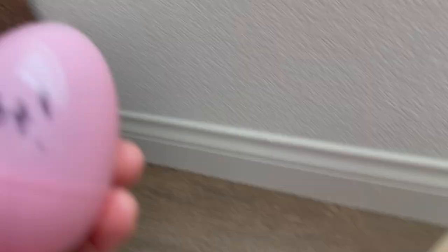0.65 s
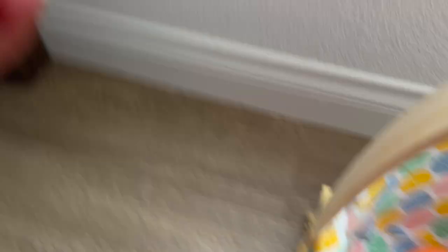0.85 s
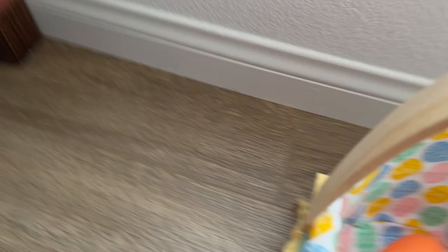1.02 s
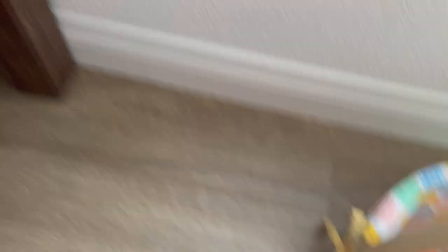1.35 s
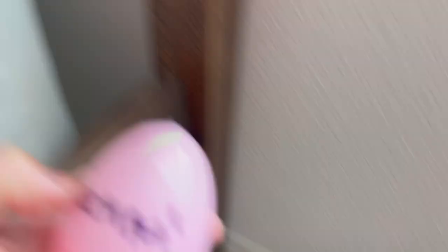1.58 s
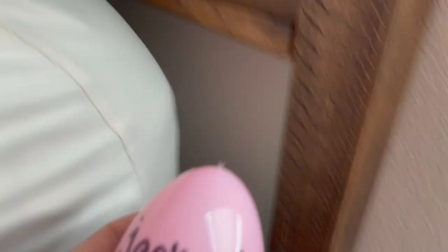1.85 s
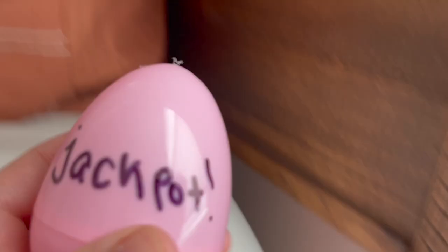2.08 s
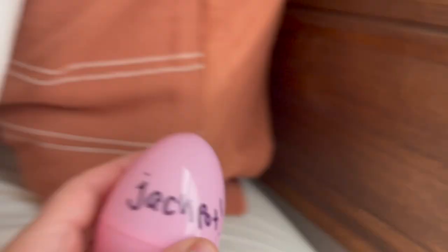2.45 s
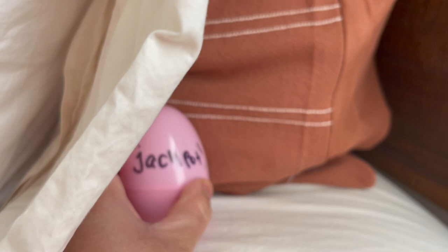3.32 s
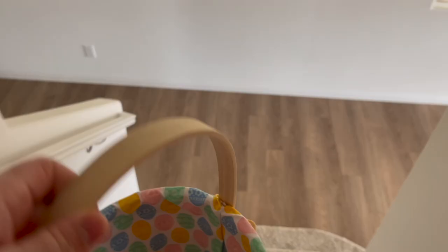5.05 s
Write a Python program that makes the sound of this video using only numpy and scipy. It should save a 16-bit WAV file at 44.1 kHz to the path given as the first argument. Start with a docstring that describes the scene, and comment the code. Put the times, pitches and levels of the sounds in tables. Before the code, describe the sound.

A dull low thump from the hand starts the scene, over soft unsteady rumble and faint still air in a small bedroom. At 0.5 seconds a light, hollow plastic egg gives a sharp close knock, with quick smaller rattles until 0.65, amid a soft cloth brush. After a near pause, a second cluster of hollow clacks comes at 1.15 to 1.27, with short crisp scrapes. Low bumps and small fabric rubs follow to 2 seconds, with a very faint tick. Bedding then rustles in longer airy strokes, fuller near 2.6, quieter around 3.4, swelling again near 4.1 and thinning after 4.3. Around 5.1 a cloth stroke stops abruptly with a muffled tick; tiny dry clicks follow near 5.65, 5.9 and 6.4, among soft low thuds and weak rustling. Everything is close, in stereo from a hand-held phone, the cloth slightly left, with little room echo.

```python
"""Cloth slides in soft strokes, a hollow plastic shell knocks, rattles and ticks, over a low rumble and thuds.
Place: a small bedroom, where an egg is carried to a bed and pushed under a duvet that lies to the left.
Distance: the egg sounds close, direct and much stronger than the room's answer; its contacts ring resonances.
Microphone: a stereo pair in a hand-held phone, shaken by the hand into decaying low swings and noise.
Cloth, tremor, mattress flutter and still air are shaped noise."""
import sys
import numpy as np
from scipy import signal
from scipy.fft import rfft, irfft, next_fast_len
from scipy.io import wavfile
from scipy.ndimage import uniform_filter1d, map_coordinates

SR = 44100
rng = np.random.default_rng(int(sys.argv[2]) if len(sys.argv) > 2 else 0)


def waveform_to_disk(signal):
    """Save audio, clipped to [-1, 1], as 16-bit WAV at the path in sys.argv[1]."""
    frames = np.transpose(np.atleast_2d(signal))
    scaled = np.clip(frames, -1, 1) * 32767
    samples = np.round(scaled).astype(np.int16)
    wavfile.write(sys.argv[1], SR, samples)


def volts_from_db(level):
    """Convert decibel levels to linear amplitude ratios."""
    exponent = np.asarray(level, float) / 20
    return 10 ** exponent


N = 284116

# resonances of the egg, one deep, two of its air, three of its wall, one of its rim:
# (frequency [Hz], width [Hz], level within its group [dB])
EGG_MODES = [(356.6, 39, 0), (617, 142, 5), (825, 168, 0.5), (1138, 140, 1.5), (1570, 630, -5),
             (2180, 450, -3.5), (3540, 510, 0)]
# knocks on the free shell: (time [s], reference peak [dB], rim ring over it [dB], crack over it [dB],
# contact [ms])
FREE_KNOCKS = [(.506, -12.5, -18.5, -7.5, 3.7), (.543, -31, -7, -5, 5.8), (.551, -35.5, 4.5, -6, 1.2),
               (.562, -25, -2, -13, 5.2), (.569, -22, 1, -3, 2.4), (.581, -36, -4, -4, 2.2),
               (.626, -28.5, -7, -15, 5.1), (.634, -32, -0.5, 3.5, 3.3), (.94, -50, -9, 7.5, 3.6),
               (.962, -48.5, -14, 11, 4.1), (1.155, -19.5, -31, -15, 4.2), (1.187, -23.5, -35, -6, 9.9),
               (1.193, -25, -20, -8, 7.1), (1.201, -24, -18, -19, 7.4), (1.206, -25, -27, -24, 7.5),
               (1.227, -29, -9, -6, 3.9), (1.237, -32, -24, 6.5, 2), (1.256, -41, -22, -1, 4.4),
               (1.267, -34.5, -34, -18.5, 2.6), (4.239, -48, -8, -5, 1.9)]
# ticks on the shell while hand and bedding muffle it: (time [s], reference peak [dB],
# rim ring over it [dB], crack over it [dB], contact [ms])
MUFFLED_TICKS = [(1.988, -48, -4, -14, 6), (3.596, -51, -22, -22, 3.5), (5.126, -42.5, -22, -19.5, 1.5),
                 (5.162, -50.5, -16, -7.5, 3), (5.269, -54, -7, -12, 4.5), (5.607, -54, -11, 2, 7.1),
                 (5.644, -41.5, -18, 7, 4.2), (5.657, -58, -2, 22, 2.9), (5.717, -51, -8, 1, 3.5),
                 (5.887, -48.5, 1.5, 3.5, 2.6), (6.054, -51, -7, 0, 6.1), (6.416, -42.5, -21, -2, 4.2),
                 (6.424, -60, -6, 25, 3)]
# pitch of the egg's air modes, sinking at first as the fingers close round it: (time [s], factor [1])
AIR_MODE_PITCH = [(.5, 1.15), (.65, 1.1), (1.15, 0.94), (6.44, 1.4)]
# strokes of cloth, and near 1.16-1.26 s of fingers slipping on the shell: (fastest moment [s], hiss [dB], #
# swell over the last 10 dB [s], fade over the first 10 dB [s], duller body over hiss [dB]); # swells and fades
# under 8 ms act as 8 ms
CLOTH_STROKES = [(0, -68.5, .1, 0.2, -1), (.45, -52, 0.116, 0.1735, -8.5), (.6, -53, 0.16, 0.1568, -2.5),
                 (.88, -79, 0.6, 0.1, 12), (.95, -69, -0.06, -0.1, -5), (1.13, -71, .14, .03, 3),
                 (1.164, -46.5, .018, .013, -5.5), (1.199, -44.5, .013, 0.01, -13),
                 (1.26, -55.5, 0.01, 0.015, -13), (1.28, -81, .06, .07, 17), (1.418, -58.5, .017, .06, -10),
                 (1.462, -58.5, .045, .035, -20), (1.555, -66.5, .07, .06, -1.5),
                 (1.67, -62.5, .035, .06, -4.5), (1.78, -61.5, .06, .055, -6), (1.89, -70, .1, .1, 2),
                 (1.995, -63, .022, .04, 5), (2.045, -68.5, .04, .045, 5), (2.135, -65.5, .065, 0.16, -10),
                 (2.35, -59.5, .022, .28, -5), (2.6, -54, 0.09, .3, -4), (2.79, -56, 0.27, 0.0652, -7),
                 (2.95, -58.5, 0.13, 0.04, -6), (3.099, -59.5, .1, 0.14, -10), (3.43, -71.5, .14, .07, -9),
                 (3.61, -84, 0.05, 0, 13.5), (3.83, -61, .1, 0.29, -8), (3.95, -59.5, 0.16, 0.29, -9),
                 (4.1, -52.5, 0.1856, 0.19, -9.5), (4.24, -61.5, .2, 0.06, -3.5),
                 (4.5, -73.5, -0.1, .1, -6), (4.6, -62.5, .07, .16, -6.5), (4.97, -58.5, 0.15, .075, -8.5),
                 (5.113, -57, .17, .009, -10.5), (5.24, -75, 0.1, 0.5, 3), (5.365, -67, .06, 0.04, 0.5),
                 (5.69, -65, 0.05, 0.07, 0), (5.9, -74, .2, 0.4, 0), (6.061, -63, 0.02, 0.03, 4.5),
                 (6.12, -73.5, 0.27, 0.1, 0), (6.36, -70, 0.06, 0.2, 0.5)]
# floor of cloth that barely moves, one row for hiss and one for body: (level [dB])
CLOTH_AT_REST = [
    [-87],
    [-94],
]
# bright noise of sliding fibres: (frequency [Hz], relative density [dB])
HISS_SPECTRUM = [(1500, -26), (2800, -9), (3800, -5), (5200, -7.5), (6800, -8.5), (8300, -3.5),
                 (10200, 0.5), (11000, 2.5), (11800, -7), (13000, -27), (15000, -60)]
# duller noise under the same strokes: (frequency [Hz], relative density [dB])
BODY_SPECTRUM = [(100, -26), (250, -12.5), (600, -11), (1200, -12.5), (2400, -15), (3500, -31.5),
                 (6000, -26)]
# the duvet lies to the left: (frequency [Hz], left over right [dB])
DUVET_LEAN = [(300, 12), (900, 4.5), (2800, 4), (3500, 0), (5500, 3), (8200, 0.5)]
# tremor of the hand on the phone: (time [s], level [dB])
HAND_TREMOR = [(0, -41), (.12, -41), (.29, -47), (.45, -42.5), (.5, -48), (.57, -38.5), (.72, -48.5),
               (.97, -44), (1.15, -47), (1.25, -40), (1.42, -46), (1.87, -51), (2.15, -49), (2.3, -54),
               (3.39, -49), (4.5, -55), (5.06, -50.5), (5.24, -53), (5.35, -42.5), (5.56, -56), (5.65, -51),
               (6.3, -50), (6.44, -45)]
# thuds of hand and mattress: (time [s], peak [dB], frequency [Hz], t60 [s], flutter burst peak [dB])
HAND_THUDS = [(0, -16, 75.8, .15, -47), (.109, -30, 69, 0.27, -68), (.27, -40, 69, 0.17, -63),
              (.505, -30, 58, .25, -34), (.569, -31.5, 52, 0.12, -55), (.63, -47, 60, .15, -45),
              (1.155, -33, 72, 0.2, -33), (1.225, -33, 61.6, .17, -40), (1.323, -37, 57.8, 0.35, -57),
              (1.499, -34.5, 57.6, 0.28, -67), (1.557, -32, 49.6, 0.32, -54.5), (2.001, -51, 60, 0.18, -46),
              (2.14, -48, 55, .2, -53), (3.578, -42, 50.7, 0.29, -56), (3.73, -42, 46.6, 0.37, -58),
              (3.9, -48, 60, .2, -52), (5.116, -38.5, 66, .13, -57), (5.287, -31.5, 80.4, 0.15, -49.5),
              (5.44, -30.5, 85.6, 0.075, -46), (5.623, -34.5, 80, .2, -50), (5.955, -43.5, 97.5, 0.35, -48),
              (6.215, -37, 79, 0.047, -59.5), (6.353, -32, 101.5, 0.2, -48.5)]
# tremor noise in the case: (frequency [Hz], relative density [dB])
RUMBLE_SPECTRUM = [(15, -35), (30, -4.5), (50, -3), (75, -3.5), (110, -11), (170, -30), (300, -61)]
# mattress noise: (frequency [Hz], relative density [dB])
FLUTTER_SPECTRUM = [(70, -20), (130, 4), (200, -3), (320, -11.5), (600, -25.5), (1200, -61)]
# decay of the bedroom: (frequency [Hz], t60 [s])
ROOM_DECAY = [(200, 0.31), (700, 0.76), (2000, 0.13), (10000, 0.27)]
# still air: (frequency [Hz], relative density [dB])
AIR_SPECTRUM = [(100, -12), (200, 1), (500, -10), (1000, -21.5), (1900, -15), (3000, -26), (6500, -36),
                (10200, -17), (11200, -23), (13000, -74)]
# the two microphones: (frequency [Hz], likeness of the noise in both [0-1], lead of the right one [rad])
MICROPHONE_PAIR = [(60, .94, .2), (300, .88, 0), (900, .7, -.2), (1900, .2, -.6), (2900, .35, -1.2),
                   (3400, .88, 0), (4500, .75, -.9), (5200, .45, -1.4), (6000, .88, 0), (6600, .9, 0),
                   (7500, .8, -1), (8600, .995, 0), (10200, .99, 3.14), (12200, .99, 6.2)]
# half of a left-right difference goes to each microphone
SIDES = np.array([[.5], [-.5]])


def egg():
    """A contact is a blow with a short gritty tail; it rings air, wall and rim and cracks in the treble."""
    out = np.zeros((2, N + SR))
    t = np.arange(SR // 8) / SR
    # low_db: deep, hollow and wall ring over the reference peak
    contacts = contact_levels(FREE_KNOCKS, low_db=[-15, 0.3, -1], wall_follows=0.26)
    contacts += contact_levels(MUFFLED_TICKS, low_db=[-10.5, -7, 0], wall_follows=.01)
    grit = rng.standard_normal((len(contacts), 2, 5, len(t)))

    # five parts: deep, hollow (air), wall, rim and crack
    crack_modes = [(8800, 5000, 0)]
    groups = [EGG_MODES[:1], EGG_MODES[1:3], EGG_MODES[3:6], EGG_MODES[6:], crack_modes]
    blow = np.array([[4.5], [3.5], [3.5], [2.5], [.3]])  # the treble is mostly grit
    spread = np.array([[.8], [.8], [.6], [.6], [.9]])  # share of the contact time
    lean_db = [6, 0.0, -1.5, 3.0, 0.0]  # left over right: how each part radiates
    sign = [1, -1, -1, 1, -1]  # polarity of each part

    for (s, *parts_db, contact_ms), (both, own) in zip(contacts, grit):
        u = 1000 * t / (spread * max(contact_ms, .3))
        # each microphone hears the grit a little differently
        noise = .5 * both + 0.38 * own * [[[1]], [[-1]]]
        gritty_tail = noise * (1 - np.exp(-3.5 * u))
        push = (gritty_tail + blow * (t == 0)) * np.exp(-u)
        for k, (modes, db) in enumerate(zip(groups, parts_db)):
            pitch = np.interp(s, *np.transpose(AIR_MODE_PITCH)) if k == 1 else 1
            ring = sign[k] * filtered(push[:, k], lambda f: ringing(modes)(f / pitch))
            gain = volts_from_db(db + SIDES * lean_db[k])
            out[:, round(s * SR):][:, :len(t)] += gain * ring / np.abs(ring).max()
    return out[:, :N]


def contact_levels(contacts, low_db, wall_follows):
    """A hard blow flexes the whole shell: (s, deep, hollow, wall, rim, crack dB, contact ms) per contact."""
    hard_blow_db, deep_grows = -20, 1.23  # above this peak the deep ring gains, dB per dB
    deep_db, hollow_db, wall_db = low_db
    rows = []
    for s, db, rim_db, crack_db, contact_ms in contacts:
        deep = db + deep_db + deep_grows * max(db - hard_blow_db, 0)
        wall = db + wall_db + wall_follows * rim_db
        rows.append((s, deep, db + hollow_db, wall, db + rim_db, db + crack_db, contact_ms))
    return rows


def ringing(modes):
    """Causal sum of resonances; neighbouring modes swing in opposition."""
    def response(f):
        total = 0
        for k, (centre, width, db) in enumerate(modes):
            damping = 1j * f * width
            total = total + (-1) ** k * volts_from_db(db) * damping / (centre * centre - f * f + damping)
        return total
    return response


def cloth():
    """Fibres slide over fibres, and fingers slip over the shell: a bright hiss and a duller body under the same
    stroke."""
    hiss_db, body_db = stroke_levels()
    drag_db = .4 * wobble(18)  # shared unevenness
    hiss_noise = rush(HISS_SPECTRUM, patchy_db=.7, grain_db=1.5, drift_db=1.5)
    hiss = volts_from_db(hiss_db + drag_db) * in_band(hiss_noise, 3200, 8500)
    body_noise = rush(BODY_SPECTRUM, patchy_db=.9, grain_db=1.5)
    body = volts_from_db(body_db + drag_db) * in_band(body_noise, 600, 2500)
    return filtered(hiss + body, lambda hz: volts_from_db(SIDES * along(DUVET_LEAN, hz)))


def stroke_levels():
    """Strokes swell to their fastest moment and fade; their powers add, in dB for hiss and body."""
    roundness = 1.34  # 1 = pointed stroke, 2 = bell
    t = np.arange(N) / SR
    power = volts_from_db(CLOTH_AT_REST) ** 2 * np.ones(N)
    for s, db, rise, fall, body_db in CLOTH_STROKES:
        distance = np.where(t < s, (s - t) / max(rise, .008), (t - s) / max(fall, .008))
        speed_db = db - 10 * distance ** roundness
        power = power + volts_from_db(2 * (speed_db + np.array([[0], [body_db]])))
    return 10 * np.log10(power)


def hand():
    """Muscle tremor rumbles the case, the mattress flutters; each jolt swings the case for a few low cycles."""
    flutter_attack_s, flutter_t60_s = 0.0073, 0.2  # the burst after a jolt
    steady_db, follows = -61, .45  # steady flutter, and its share of the tremor's swings in dB
    jolts, bursts = np.zeros(N + SR), np.zeros(N + SR)
    t = np.arange(SR // 2) / SR
    for s, db, hz, t60, burst_db in HAND_THUDS:
        start = round(s * SR)
        swing = np.sin(2 * np.pi * hz * t) * volts_from_db(-60 * t / t60) * (1 - np.exp(-t / 0.013))
        jolts[start:][:len(t)] += volts_from_db(db) * swing / np.abs(swing).max()
        burst = volts_from_db(-60 * t / flutter_t60_s) * (1 - np.exp(-t / flutter_attack_s))
        bursts[start:][:len(t)] += volts_from_db(burst_db) * burst / burst.max()

    tremor_db, = curves(HAND_TREMOR)
    rumble = volts_from_db(tremor_db) * rush(RUMBLE_SPECTRUM, patchy_db=1.5, grain_db=4.5)
    steady = volts_from_db(steady_db + follows * (tremor_db - tremor_db.mean()))
    flutter_level = np.hypot(steady, bursts[:N])
    flutter = flutter_level * rush(FLUTTER_SPECTRUM, patchy_db=2.5, grain_db=-1.0)
    return jolts[:N] + rumble + flutter


def room(x):
    """Each frequency dies at its own speed; the tail is drawn anew for each stretch of time."""
    out = np.zeros((2, N + SR))
    step = SR // 5
    for start in range(0, N, step):
        hz, t, z = signal.stft(rng.standard_normal((2, SR // 2)), SR, nperseg=256)
        decay = volts_from_db(-60 * t / along(ROOM_DECAY, hz)[:, None])
        tail = signal.istft(z * decay, SR, nperseg=256)[1]
        tail = tail / np.linalg.norm(tail[0])
        wet = signal.fftconvolve(x[:, start:start + step], tail, axes=1)
        out[:, start + 200:][:, :wet.shape[1]] += wet  # first walls after about 5 ms
    return out[:, :N]


def still_air():
    """A faint steady noise behind everything."""
    return volts_from_db(-64.5) * rush(AIR_SPECTRUM, patchy_db=2.5, grain_db=1.7)


def rush(spectrum, patchy_db, grain_db, drift_db=0):
    """Stereo noise of rms 1 with patches of random gain, slowly drifting colour and fine grain."""
    z = signal.stft(rng.standard_normal((2, N)), nperseg=512)[2]
    field = rng.standard_normal(z.shape[1:])  # frequency by time
    field = uniform_filter1d(uniform_filter1d(field, 6, 0), 10, 1)
    drift = uniform_filter1d(uniform_filter1d(field, size=14, axis=0), size=40, axis=1)
    gain = volts_from_db(patchy_db * unit(field) + drift_db * unit(drift))
    pair = signal.istft(z * gain, nperseg=512)[1][:, :N]
    pair = pair * volts_from_db(grain_db * wobble(300))

    def shape(hz):
        # this angle between mid and side gives the two microphones their likeness
        turn = np.arccos(np.clip(along(MICROPHONE_PAIR, hz), 0, 1)) / 2
        return volts_from_db(along(spectrum, hz)) * [np.cos(turn), np.sin(turn)]

    mid, side = filtered(pair, shape)
    return unit(np.array([mid + side, mid - side]))


def in_band(x, low_hz, high_hz):
    """Scaled so that the part of its left-right mean between two frequencies has rms 1."""
    return x / filtered(x.mean(0), lambda hz: (hz > low_hz) & (hz < high_hz)).std()


def unit(x):
    """Scaled to rms 1."""
    return x / np.sqrt(np.mean(x ** 2) + 1e-20)


def along(points, hz, axis=1):
    """One column of a table over log frequency."""
    rows = np.array(points)
    return np.interp(np.log(hz + 1), np.log(rows[:, 0] + 1), rows[:, axis])


def curves(rows):
    """One value per sample for each column after the time."""
    s, *cols = np.transpose(rows)
    return [np.interp(np.arange(N) / SR, s, c) for c in cols]


def wobble(rate):
    """A smooth random curve, rate knots a second."""
    knots = rng.standard_normal(int(N * rate / SR) + 4)
    return map_coordinates(knots, [np.arange(N) * rate / SR])


def filtered(x, response):
    """x times a complex response of frequency."""
    m = next_fast_len(x.shape[-1] + 8192)
    return irfft(rfft(x, m) * response(np.fft.rfftfreq(m, 1 / SR)), m)[..., :x.shape[-1]]


def scene():
    """Egg with its room, cloth, hand and the still air."""
    shell = egg()
    return shell + volts_from_db(-15.5) * room(shell) + cloth() + hand() + still_air()


def band_limit(x):
    """A steep low-pass at the top of the band."""
    return signal.sosfilt(signal.butter(12, 12820, fs=SR, output="sos"), x)


def record(dry):
    """The two microphones differ in phase with frequency and roll off steeply at the top."""
    def microphones(hz):
        phase = np.exp(-1j * SIDES * along(MICROPHONE_PAIR, hz, axis=2))
        return phase / (1 + (hz / 12200) ** 12)

    return band_limit(filtered(dry, microphones))


dry = scene()
out = record(dry)
waveform_to_disk(out)
```